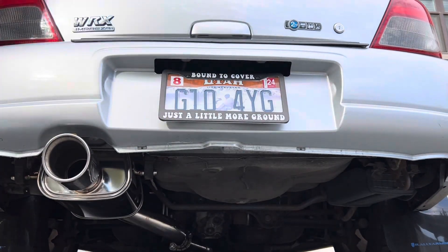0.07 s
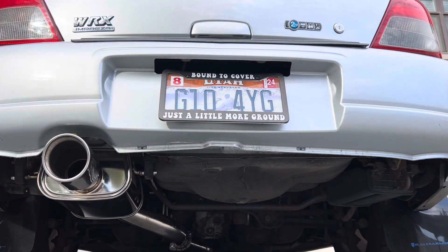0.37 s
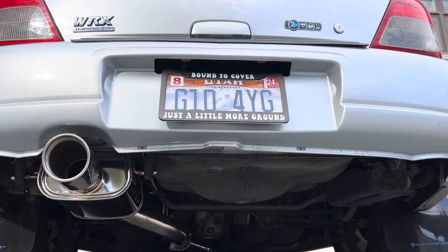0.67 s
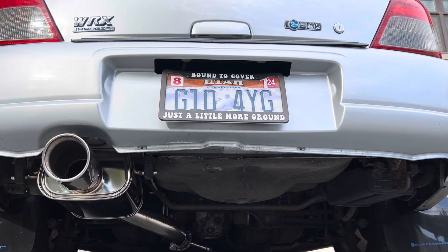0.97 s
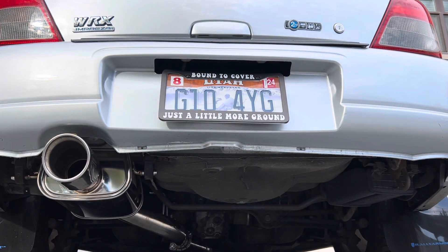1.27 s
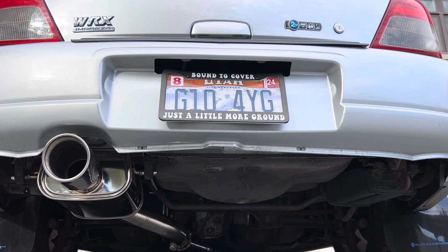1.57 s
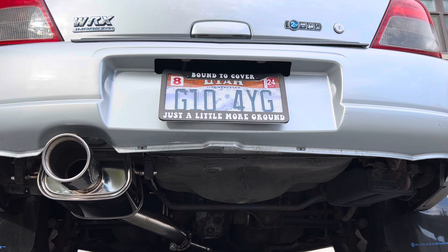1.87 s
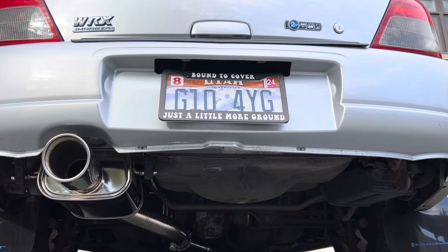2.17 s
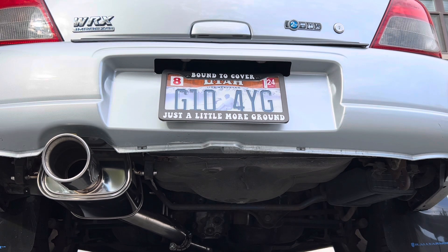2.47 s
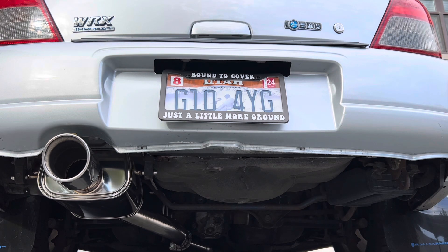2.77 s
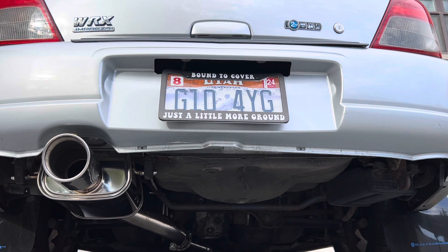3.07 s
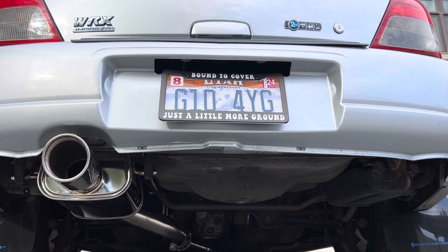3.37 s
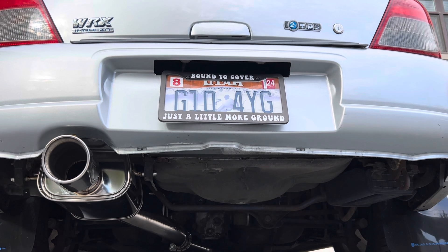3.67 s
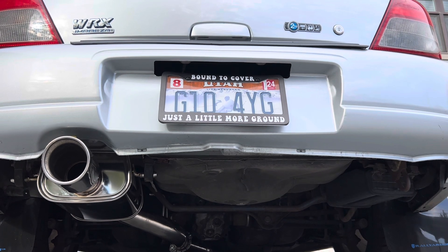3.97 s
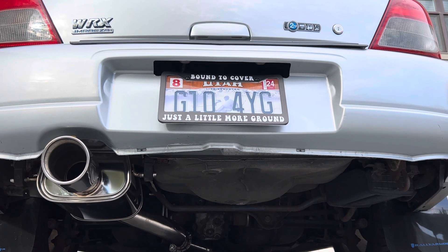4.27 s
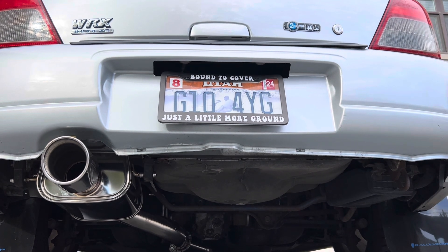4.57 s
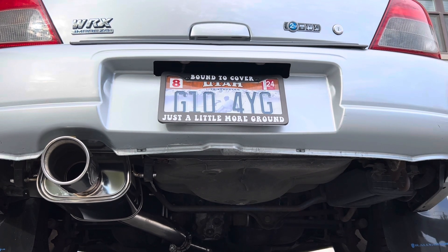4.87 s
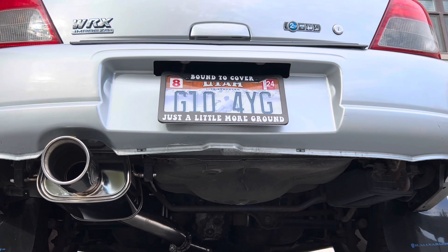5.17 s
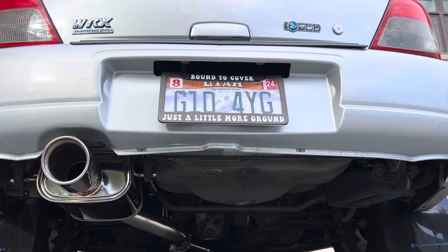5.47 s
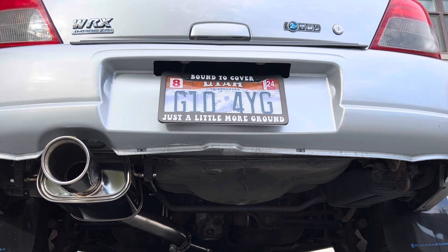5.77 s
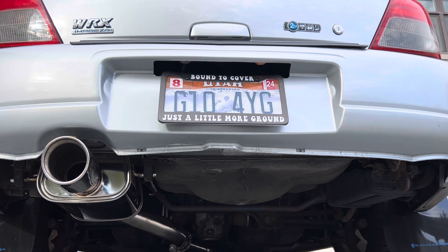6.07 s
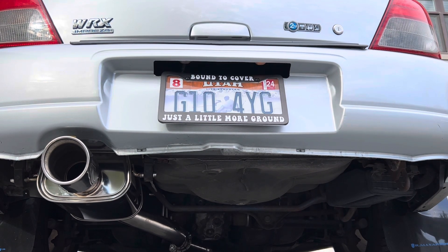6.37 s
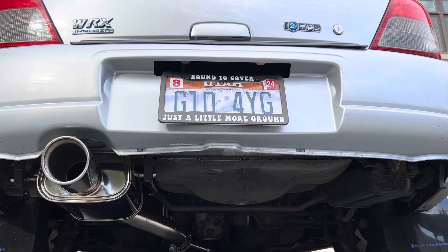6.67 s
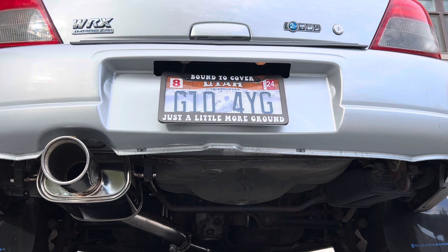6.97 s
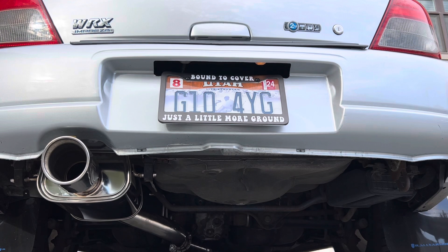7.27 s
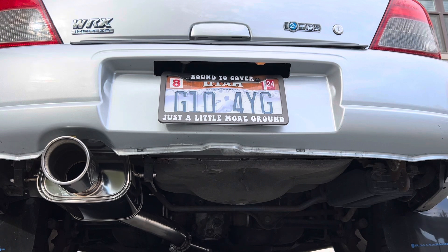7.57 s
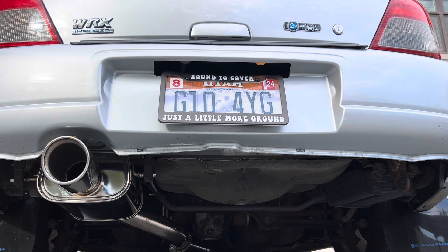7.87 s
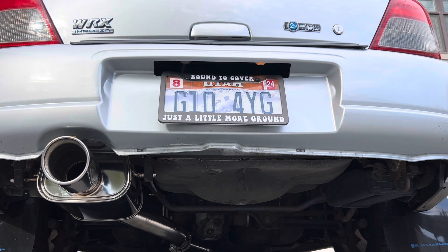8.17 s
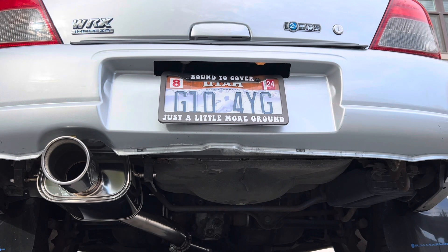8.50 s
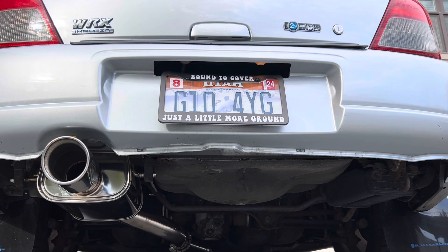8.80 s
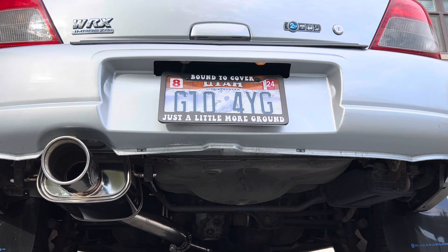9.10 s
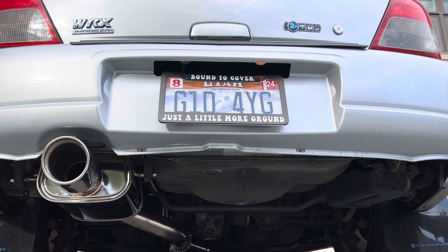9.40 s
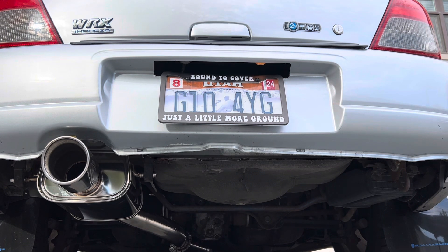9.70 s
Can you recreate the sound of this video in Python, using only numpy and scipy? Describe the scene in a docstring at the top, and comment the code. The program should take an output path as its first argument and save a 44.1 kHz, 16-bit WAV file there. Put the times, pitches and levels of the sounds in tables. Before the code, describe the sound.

After a few dull knocks over street rumble, a car starts up and runs with a low, pulsing exhaust boom.

```python
"""A flat-four car starts from cold outdoors, heard from just behind its big tailpipe.
First the street rumbles and two far vehicles drone by, while knocks, scuffs and keys sound around the car.
At 5.5 s an actuator whines, then the starter grinds and clacks through four puffing compressions.
At 6.6 s the engine catches, flares and sinks towards a fast idle, with belt whines and a thin whistle.
Each firing rings the exhaust, and header pipes of unequal length make it throb."""
import sys
import numpy as np
from scipy import signal
from scipy.io import wavfile
from scipy.ndimage import uniform_filter1d

SR = 44100
rng = np.random.default_rng(int(sys.argv[2]) if len(sys.argv) > 2 else 0)


def digitize_waveform(pressure):
    """Quantize a signal to 16-bit integers and store it at the path in sys.argv[1].

    Rows of a 2-D input are taken as channels; values are limited to [-1, 1].
    """
    field = np.atleast_2d(pressure).T
    bounded = np.clip(field, -1, 1)
    quanta = np.round(bounded * 32767).astype(np.int16)
    wavfile.write(sys.argv[1], SR, quanta)


N = 438354
TIME = np.arange(N) / SR
CATCH_S, SAG_FROM_S = 6.586, 7.398   # the engine first fires; its speed starts to sink
JOLT_S = 5.895   # the starter's small gear takes up the flywheel


# How hard the exhaust works. Each row: time in seconds, boom level in dB, bark level in dB.
EXHAUST_EFFORT = [(6.6, -9, -35.5), (6.64, -6.5, -25), (6.89, -7.5, -18.5), (7.45, -7, -21),
                  (8.18, -9.5, -27.5), (8.9, -11, -24.5), (9.86, -11, -30), (9.88, -9.5, -30)]
# Fuel that burns late and barks out. Each row: time in seconds, extra bark in dB.
LATE_BARKS = [(6.811, 9.5), (6.915, 7)]
# The notes at which pipe and silencer ring: cold, then the hot boom, then the higher bark.
# Each row: pitch in Hz, width in Hz, level in dB, sign (-1 flips the wave).
COLD_PIPE_NOTES = [(70.5, 6.3, 5.5, 1), (102, 53, -9.5, -1), (174, 23.5, -12.5, 1)]
BOOM_NOTES = [(57.6, 15.84, 0.5, 1), (117.4, 9, -3, -1), (130.2, 14.3, -8, -1), (162, 53, -25, -1)]
BARK_NOTES = [(223.8, 11.5, 2, 1), (301.4, 15.8, -10, -1), (352.7, 21.3, -3.5, -1), (457.5, 37, -9, 1),
              (506, 68, -13, -1), (640, 120, -24, 1), (791, 36, -20.5, -1)]
def exhaust():
    """Each firing rings the pipe: a deep boom, a bark roughened by swirling gas, and a rush."""
    boom_db, bark_db = in_time(EXHAUST_EFFORT)
    bark_db = bark_db + sum(db * swell(s, spread_s=.012) for s, db in LATE_BARKS)
    times, pulse_db, front_db = firings(rough_db=.25, jitter_s=.00005)
    pulses = clicks(times, from_db(pulse_db))
    fronts = clicks(times, from_db(front_db))   # weak pulses still open with a steep front
    hot = fade(6.68, 6.79)   # the notes shift as hot gas fills the pipe
    boom = ring(pulses * (1 - hot), COLD_PIPE_NOTES) + cut(ring(pulses * hot, BOOM_NOTES), 41, "high")
    blast = rms_one(np.abs(cut(pulses, 48, "low", order=1)))
    eddies = rms_one(blast * rng.standard_normal(N))
    bark = cut(ring(rms_one(fronts) + from_db(-20) * eddies, BARK_NOTES), 990, "low")
    running = (TIME >= CATCH_S) * 1.
    boom = from_db(boom_db + .5) * evened(boom, running)
    bark = from_db(bark_db - .06) * evened(bark, running)
    return driveway(boom + bark, echo_db=-11, t60=.11) + gas_rush(blast)


# The cylinders in firing order. Each row: lateness as a share of the gap between firings,
# boom strength in dB, bark strength in dB.
FIRING_ORDER = [(0.0775, -3.5, 4.5), (.064, 6, 1), (-.003, 4, 3), (-.139, 4.5, 0.5)]
def firings(rough_db, jitter_s):
    """Time, boom and bark of each firing: ragged at first, then a limping four-beat pattern."""
    rate = engine_speed()
    count = np.cumsum(rate * (TIME >= CATCH_S)) / SR
    number = np.arange(int(count[-1]) + 1)
    times = np.interp(number + 1e-6, count, TIME)
    late, boom_db, bark_db = np.array(FIRING_ORDER)[number % len(FIRING_ORDER)].T
    settled = np.interp(times, [6.65, 7.05], [0, 1])
    chance = rng.standard_normal((len(times), 2)) * (1 + 5 * (1 - settled))[:, None]
    times = times + settled * late / np.interp(times, TIME, rate) + jitter_s * chance[:, 0]
    uneven_db = rough_db * chance[:, 1]
    return times, settled * boom_db + uneven_db, settled * bark_db + uneven_db


def engine_speed():
    """Firings per second: a quick flare, a steady sag, and one step down as the idle valve closes."""
    catch_hz, flare_hz, sag_hz_per_s, sag_until_s, step_hz = 14.93, 69.56, 7.945, 9.243, 4.27
    still_to_gain = (flare_hz - catch_hz) * die_away(CATCH_S, decay_s=.241)
    sag = sag_hz_per_s * np.clip(TIME - SAG_FROM_S, 0, sag_until_s - SAG_FROM_S)
    return flare_hz - still_to_gain - sag - step_hz * fade(9.52, 9.62)


# The tone of the rushing gas. Each row: frequency in Hz, relative level in dB.
RUSH_COLOUR = [(500, 9.5), (900, 3), (1400, -3.5), (2100, -7), (3000, -9), (4500, -13), (6000, -16.5),
               (8500, -19), (12500, -20), (15000, -31)]
def gas_rush(blast):
    """Gas hisses, swelling with each pulse, over the ringing engine; both settle after the flare."""
    hiss = from_db(1.8) * banded_noise(RUSH_COLOUR, flicker_db=.5) * (1.25 + .026 * blast)
    metal = from_db(-7) * block_ring()
    return (hiss + metal) * from_db(-47 + 12 * die_away(7.12, decay_s=1.36)) * fade(6.75, 6.9)


# The notes of the engine block. Each row: pitch in Hz, width in Hz, level in dB, sign.
BLOCK_NOTES = [(1514, 44, -2, 1), (1740, 32, -2.5, -1), (1974, 22, -7, 1), (2507, 57, -5.5, -1),
               (2720, 31, -3, 1), (2920, 49, -4, -1), (3186, 37, -4.5, 1), (3330, 58, -9.5, -1),
               (3950, 33, -5.5, 1), (4384, 120, -6.5, -1), (4770, 120, -19.5, 1), (6160, 140, -12, -1)]
def block_ring():
    """Countless small contacts keep the engine's metal ringing."""
    metal = rms_one(ring(rng.standard_normal(N), BLOCK_NOTES))
    return driveway(metal, echo_db=-7.5, t60=.079)


# The starter squeezes air in one cylinder after another.
# Each row: time in seconds, puff level in dB, strain on the gears in dB.
SQUEEZES = [(5.994, -13.5, -27), (6.185, -11.5, -24), (6.349, -18, -26), (6.5, -16.5, -26.5)]
def cranking_puffs():
    """Each unfired cylinder sends a soft puff through the cold pipe."""
    times, db, _ = np.transpose(SQUEEZES)
    puffs = clicks(times, from_db(db))
    thuds = cut(ring(puffs, COLD_PIPE_NOTES) + .5 * resonate(puffs, hz=41, width_hz=27), 80, "low")
    return thuds / np.abs(thuds).max() * from_db(db.max())


# The notes of the gear case. Each row: pitch in Hz, width in Hz, level in dB, sign.
GEAR_CASE_NOTES = [(498, 42, 1.5, 1), (637, 85, 2.5, -1), (810, 60, 2, 1), (1040, 74, -3.5, -1),
                   (1780, 450, -5, 1)]
# The tone of the grinding. Each row: frequency in Hz, relative level in dB.
GRIND_COLOUR = [(250, -9), (500, 0), (900, 0.5), (1700, -7), (2300, -2), (3500, -1.5), (5500, -8.5),
                (8000, -5.5), (12500, -10), (15000, -25)]
def starter():
    """Gear teeth strike their case over a gritty grind; each squeeze makes them louder and slower."""
    full_speed_hz, key_released_s = 423, 6.815
    jolt = swell(JOLT_S, spread_s=.02)
    strain = sum(from_db(db) * swell(s - .0027, spread_s=.035) for s, _, db in SQUEEZES)
    drag = .28 * sum(swell(s + .038, spread_s=.026) for s, _, _ in SQUEEZES)
    run_up = 1 - die_away(5.825, decay_s=.135)
    teeth_per_s = full_speed_hz * run_up * (1 - drag) * (1 + .03 * drift(60))
    teeth_passed = np.floor(np.cumsum(teeth_per_s) / SR)
    strikes = np.diff(teeth_passed, prepend=0) * from_db(4.6 * rng.standard_normal(N))
    gear = rms_one(ring(strikes, GEAR_CASE_NOTES)) * from_db(-8.5) * (strain + from_db(-22) * jolt)
    grind = from_db(-1) * banded_noise(GRIND_COLOUR, flicker_db=3.5) + from_db(-6) * block_ring()
    grind = grind * from_db(.78 * drift(220))
    overrun = fade(6.48, 6.66)   # the engine begins to outrun the starter
    load = from_db(-35.5) + from_db(-27) * jolt + from_db(-10) * strain + from_db(-29.5) * overrun
    engaged = fade(5.86, 5.878) * die_away(key_released_s, decay_s=.082)
    return engaged * (load * grind + driveway(gear, echo_db=0, t60=.11))


# Clacks of the starter gear. Each row: start in seconds, level in dB, seconds to fade by 60 dB.
GEAR_CLACKS = [(5.876, -21, 0.11), (6.108, -30, .2), (6.306, -31, .2), (6.463, -27.5, .15),
               (6.587, -47, 0.58), (7.005, -34, .2)]
def clacks():
    """The starter gear rattles brightly as it bites at each squeeze, is outrun and draws back."""
    loudness = sum(burst(s, db, t60) for s, db, t60 in GEAR_CLACKS)
    bright_colour = [(600, -13), (2000, 4), (8000, 11), (13000, -26), (15000, -16)]
    return loudness * banded_noise(bright_colour, flicker_db=4.5)


# Whines of the belt and the parts it drives. Each row: multiple of the firing rate,
# loudest moment in seconds, spread in seconds, level in dB.
BELT_WHINES = [(12, 7.56, 0.42, -36.5), (13, 8.45, 0.18, -43.5), (12, 9.4, 0.18, -42), (18, 7.5, 0.7, -50),
               (24, 8.09, 0.33, -50.5), (37, 9.1, 0.11, -54.5)]
def belt_whines():
    """Belt teeth and pulleys sing at multiples of engine speed, swelling as they pass resonances."""
    phase = 2 * np.pi * np.cumsum(engine_speed() * (1 + .0035 * drift(16))) / SR
    tones = sum(from_db(db) * swell(s, spread) * np.sin(multiple * phase)
                for multiple, s, spread, db in BELT_WHINES)
    return np.sqrt(2) * tones * (TIME > 7.2)


# An electric whistle. Its one row: pitch in Hz, base level in dB.
THIN_WHISTLE = [(12182, -64.5)]
def electrics():
    """An actuator whines briefly once the ignition is on; a thin whistle comes when the engine runs."""
    whine = sum(from_db(db + 2 * drift(15)) * np.sin(2 * np.pi * hz * TIME)
                for hz, db in [(1958, -63), (2937, -73)])
    whine = whine * fade(5.54, 5.555) * (TIME < JOLT_S)
    (hz, db), = THIN_WHISTLE
    whistle = from_db(db + 4.5 + 2.5 * drift(25)) * sine(hz + 14 * drift(40))
    whistle = whistle * swell(8.45, spread_s=.98) * fade(CATCH_S, SAG_FROM_S)
    return np.sqrt(2) * (whine + whistle)


# Knocks on the car. Each row: start in seconds, level in dB, pitch in Hz,
# seconds to fade by 60 dB, rattle in dB compared with the note.
BODY_KNOCKS = [(.024, -22.5, 252, 0.059, 1), (.89, -26.5, 86.5, .2, -18), (1.592, -25, 140, 0.21, 3.5),
               (1.624, -22.5, 65, 0.18, -7), (3.206, -25.5, 338, 0.1, -2), (3.695, -17.5, 265, .15, -6.5),
               (3.708, -18.5, 179, 0.14, -6), (3.735, -23, 117, 0.16, -8), (4.305, -35, 422, 0.094, 4.5)]
# The tone of a rattling panel. Each row: frequency in Hz, relative level in dB.
PANEL_COLOUR = [(60, 5), (150, 8.5), (300, -4.5), (480, -0.5), (900, -16), (1800, -16.5), (2600, -30),
                (8000, -56)]
def knocks():
    """Each dull knock rings one low note in the car body and rattles its panels."""
    rattle = cut(banded_noise(PANEL_COLOUR, flicker_db=3.5), 1340, "low")
    out = 0
    for s, db, hz, t60, rattle_db in BODY_KNOCKS:
        note = np.sin(2 * np.pi * hz * (TIME - s))
        out = out + burst(s, db, t60) * fade(s, s + .0062) * (note + from_db(rattle_db) * rattle)
    return out


# Scuffs and clicks. Each row: start in seconds, level in dB, decay in seconds, brightest frequency in Hz.
SCUFF_STROKES = [(.46, -51.5, .08, 3000), (1.085, -44, 0.046, 3520), (1.593, -45.5, 0.02, 1800),
                 (1.94, -50, 0.02, 1900), (2.618, -38, 0.011, 4200), (3.278, -42.5, .02, 700),
                 (3.633, -41, 0.08, 1560), (4.029, -51, 0.11, 2000), (4.55, -46, 0.012, 2500),
                 (5.18, -46.5, .016, 3000), (5.779, -43, 0.031, 5030)]
# The tone of the grit. Each row: frequency in Hz, relative level in dB.
GRIT_COLOUR = [(300, -6), (1200, 2.5), (3500, -5), (6000, -13.5), (8500, -11.5), (14000, -22)]
def scuffs():
    """Short gritty scrapes around the car, each with a broad ring of its own."""
    grit = banded_noise(GRIT_COLOUR, flicker_db=1.5) * from_db(2.5 * drift(200))
    out = 0
    for s, db, decay_s, hz in SCUFF_STROKES:
        stroke = from_db(db) * fade(s, s + decay_s / 4) * die_away(s, decay_s)
        out = out + stroke * (grit + resonate(grit, hz, width_hz=670))
    return out


# Small keys clink. Each row: start in seconds, level in dB.
KEY_CLINKS = [(3.69, -56), (3.825, -53), (3.955, -62), (5.21, -62)]
def keys():
    """Each clink is a thin, quickly dying shimmer."""
    shimmer = rng.standard_normal((2, N))
    for _ in range(2):
        shimmer = resonate(shimmer, hz=13000, width_hz=1300)
    return rms_one(shimmer) * sum(burst(s, db, t60=.17) for s, db in KEY_CLINKS)


# The tone of the street. Each row: frequency in Hz, relative level in dB.
STREET_COLOUR = [(15, -36), (25, -28), (54, 2.5), (150, -5), (176, -9.5), (256, -9.5), (285, -15.5),
                 (309, -14.5), (1240, -22), (2290, -34.5), (3910, -38), (7640, -47.5), (9710, -50.5),
                 (11700, -52.5), (14900, -64)]
# Far vehicles. Each row: start in seconds, end in seconds, starting pitch in Hz, level in dB.
FAR_VEHICLES = [(-.25, 2.05, 150.6, -42), (2.3, 4.5, 119.8, -45)]
def street():
    """Low outdoor rumble and the drone of far traffic, sinking in pitch as it passes."""
    sink_hz_per_s, fade_s = 4.2, .22
    out = from_db(-37) * banded_noise(STREET_COLOUR, flicker_db=1.78)
    for start, end, hz, db in FAR_VEHICLES:
        pitch = hz - sink_hz_per_s * (TIME - start) + 1.75 * drift(4.2)
        passing = fade(start, start + fade_s) * (1 - fade(end - fade_s, end))
        out = out + np.sqrt(2) * passing * from_db(db + 2 * drift(7.1)) * sine(pitch)
    return out


def driveway(x, echo_db, t60):
    """Ground, underbody and walls scatter the mids and highs differently to each side."""
    age = TIME[:SR // 3]
    tails = rng.standard_normal((2, len(age))) * from_db(-60 * age / t60) * (age > .002)
    tails /= np.sqrt(np.sum(tails ** 2, axis=1, keepdims=True))
    echo = signal.fftconvolve(cut(x, 150, "high")[None], tails, axes=1)[:, :N]
    return x + from_db(echo_db) * echo


# How alike left and right are. Each row: frequency in Hz, likeness (1 same, 0 unrelated, -1 opposite).
STEREO_LIKENESS = [(100, 0.98), (300, 0.62), (600, 0.07), (1100, 0), (2200, 0.55), (4500, 0.6),
                   (8000, -.45), (12500, 0.4)]
def banded_noise(colour, flicker_db):
    """Stereo noise of power 1 in half-octave bands, each with its own level, flicker and likeness."""
    out, edges = 0, 30 * 2 ** np.arange(0, 9.1, .5)
    white = rng.standard_normal((2, 2, N))
    for k, (low, high) in enumerate(zip(edges, edges[1:])):
        if high < colour[0][0]:
            continue
        hz = np.sqrt(low * high)
        mid, side = cut(white[k % 2], [low, high], "band")
        alike = at_hz(STEREO_LIKENESS, hz)
        gain = from_db(at_hz(colour, hz) + flicker_db * drift(11.4))
        out = out + gain * (np.sqrt(1 + alike) * mid + np.sqrt(1 - alike) * side * [[1], [-1]])
    return rms_one(out)


def from_db(db):
    """Turn decibels into a gain."""
    return 10 ** (np.asarray(db) / 20)


def rms_one(x):
    """Scale to an average power of 1."""
    return x / np.sqrt(np.mean(x ** 2) + 1e-20)


def evened(x, running):
    """Hold the power near 1 over about two engine cycles while the engine runs."""
    power, share = (uniform_filter1d(v, size=7000) for v in (x * x * running, running))
    return x * np.sqrt(np.abs(share) / (np.abs(power) + 1e-6 * np.mean(x * x)))


def in_time(rows):
    """Join timed rows with straight lines, one curve for each column."""
    s, *columns = np.transpose(rows)
    return [np.interp(TIME, s, c) for c in columns]


def at_hz(points, hz):
    """Read between a table's frequencies, with octaves evenly spaced."""
    frequencies, values = np.transpose(points)
    return np.interp(np.log(hz), np.log(frequencies), values)


def fade(start, end):
    """Ramp from 0 to 1 between two moments."""
    return np.clip((TIME - start) / (end - start), 0, 1)


def swell(s, spread_s):
    """A bell-shaped rise and fall of height 1 around a moment."""
    return np.exp(-.5 * ((TIME - s) / spread_s) ** 2)


def die_away(s, decay_s):
    """Stay at 1 until a moment, then fall to about a third every decay_s seconds."""
    return np.exp(-np.maximum(TIME - s, 0) / decay_s)


def burst(s, db, t60):
    """Jump from silence to a level, then lose 60 dB every t60 seconds."""
    return from_db(db - 60 * np.maximum(TIME - s, 0) / t60) * (TIME > s)


def drift(rate_hz):
    """A smooth random wobble, about 1 in size."""
    r = np.exp(-80 * np.pi * rate_hz / SR)
    slow = signal.lfilter([1], [1, -2 * r, r * r], rng.standard_normal(N // 40 + 2002))[2000:]
    return np.interp(np.arange(N) / 40, np.arange(len(slow)), rms_one(slow))


def sine(hz):
    """A pure tone that follows a changing pitch."""
    return np.sin(2 * np.pi * np.cumsum(hz) / SR)


def clicks(times, sizes):
    """Clicks one sample long."""
    out = np.zeros(N)
    np.add.at(out, np.clip(np.round(times * SR).astype(int), 0, N - 1), sizes)
    return out


def cut(x, hz, kind, order=2):
    """Keep the lows, the highs or a band; "bandstop" removes a band."""
    return signal.sosfilt(signal.butter(order, hz, kind, fs=SR, output="sos"), x + 1e-18)


def resonate(x, hz, width_hz):
    """Ring at one note; the narrower it is, the longer it rings."""
    r = np.exp(-np.pi * width_hz / SR)
    feedback = [1, -2 * r * np.cos(2 * np.pi * hz / SR), r * r]
    return signal.lfilter(np.array([1, 0, -1]) * (1 - r * r) / 2, feedback, x + 1e-18)


def ring(x, notes):
    """Ring at several notes at once."""
    return sum(sign * from_db(db) * resonate(x, hz, width) for hz, width, db, sign in notes)


def scene():
    """The car in front, the street all round."""
    car = exhaust() + belt_whines() + cranking_puffs() + starter() + clacks() + electrics()
    return car + knocks() + scuffs() + keys() + street()


def record(dry):
    """The microphone's opening loses a band near 10 kHz; big swings are rounded off; the top is cut."""
    cutoff_hz = 14500
    notched = cut(dry, [9050, 11150], "bandstop", order=3)
    rounded = notched / (1 + (np.abs(notched) / .97) ** 8) ** (1 / 8)
    return signal.sosfilt(signal.ellip(10, .1, 80, cutoff_hz, fs=SR, output="sos"), rounded)


dry = scene()
out = record(dry)
digitize_waveform(out)
```